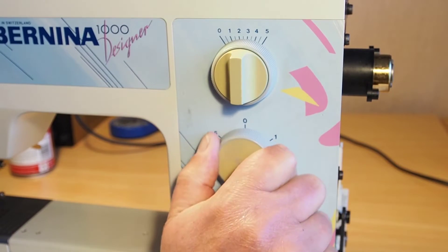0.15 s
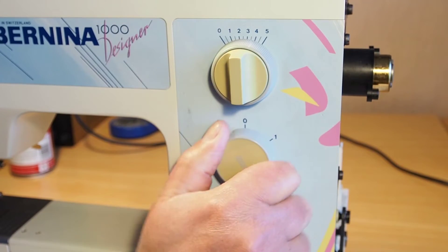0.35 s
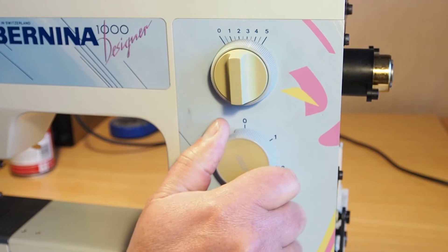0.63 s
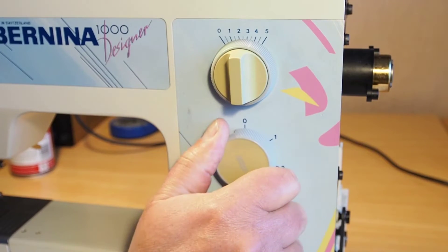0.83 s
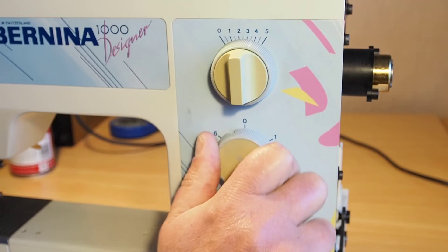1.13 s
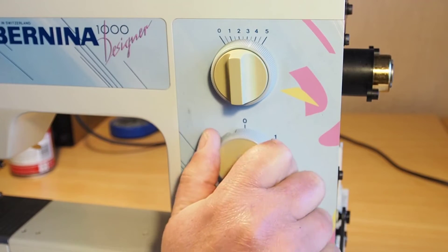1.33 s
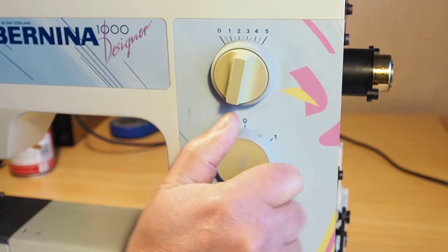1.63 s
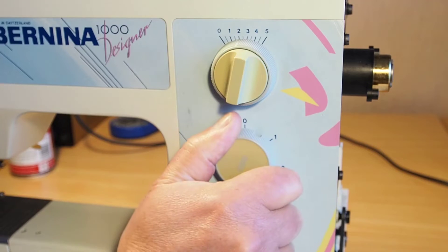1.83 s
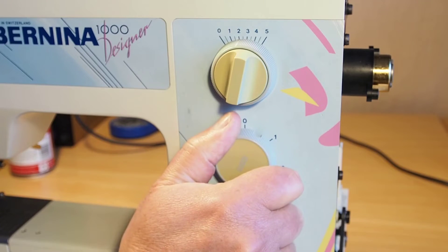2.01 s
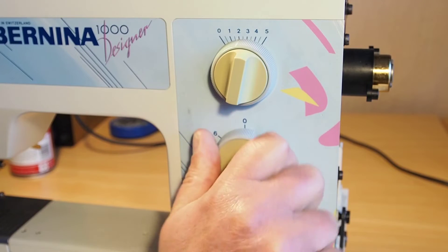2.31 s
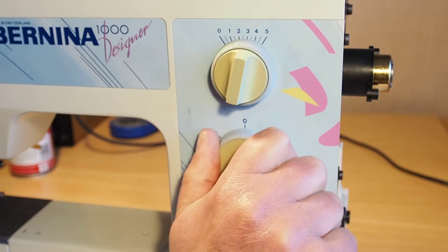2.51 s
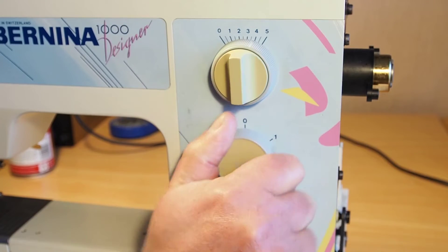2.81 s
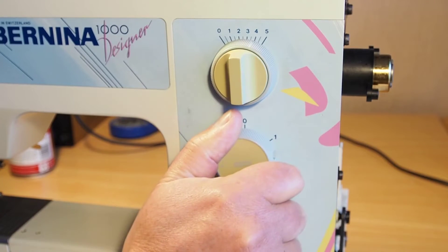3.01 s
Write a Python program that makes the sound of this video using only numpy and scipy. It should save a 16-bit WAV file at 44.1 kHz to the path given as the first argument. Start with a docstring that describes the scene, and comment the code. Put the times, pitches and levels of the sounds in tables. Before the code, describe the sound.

A sewing machine's selector dial clicks through three steps, close up in a small, quiet, hissing and faintly humming room. Soft scrapes and ticks begin around 0.1 s, then a bright snap at 0.37 s and a knock at 0.40 s set the metal frame ringing. Fingers brush softly from about 0.9 s. Ticks from 1.4 s lead to a sharp snap and knock at 1.65 s; another follows at 2.85 s, its ring fading.

```python
"""Hiss and low hum of a small quiet room, then fingers sliding on the selector dial of a sewing machine.
A hand turns the dial three steps, close to the microphone: soft scrapes and ticks as the linkage loads,
a bright rattle as the detent snaps over, then a knock as a part seats and leaves the metal frame ringing.
Gritty contacts drive decaying modes and a short ping; thuds and frame rings are plain sines.
Skin, air and room echoes are noise shaped by frequency."""
import sys
import numpy as np
from scipy import signal
from scipy.fft import rfft, irfft
from scipy.io import wavfile
from scipy.ndimage import uniform_filter1d

SR = 44100
rng = np.random.default_rng(int(sys.argv[2]) if len(sys.argv) > 2 else 0)


def unload_audio(sound):
    """Save the sound as a 16-bit wav file, at the path given as the first command line argument."""
    columns = np.transpose(np.atleast_2d(sound))
    # keep every value between -1 and 1, then stretch to whole-number steps
    steps = np.round(np.clip(columns, -1, 1) * 32767)
    wavfile.write(sys.argv[1], SR, steps.astype(np.int16))


N = 138915  # samples, 3.15 s

# a part seats after each snap: start_s, mid_modes_db, then relative to it low_modes_db, treble_modes_db,
# top_modes_db; contact_ms (decay), ping_hz, ping_db (relative)
SEATINGS = [(0.4037, -23.5, -1.1, -7.5, -21, 9.1, 4450, 7.7), (1.6708, -20.5, -2, -21, -7, 6.1, 4260, 0.75),
            (2.8785, -21, -2.4, -4, -13, 7.6, 4740, 8.1)]
# left-right likeness of the noise in the room: frequency_hz, likeness (0 to 1)
LIKENESS = [(30, 0.81), (125, 0.56), (300, .45), (2000, 0.15), (4000, .3), (5800, .4), (7500, 0.99),
            (16000, 1)]


def undb(db):
    """Decibels to amplitude."""
    return 10 ** (np.asarray(db) / 20)


def curve(table, hz):
    """Read a table of (frequency, value) at any frequency, on a logarithmic axis."""
    table = np.array(table, float)
    return np.interp(np.log(hz + 1), np.log(table[:, 0]), table[:, 1])


def stereo(gain, likeness, size=N):
    """Left and right noise with a gain and a likeness for each frequency."""
    hz = np.arange(size // 2 + 1) * SR / size
    alike = np.clip(curve(likeness, hz), 0, 1)
    spectra = rfft(rng.standard_normal((2, size))) * gain(hz)
    mid, side = spectra * np.sqrt([(1 + alike) / 2, (1 - alike) / 2])
    return irfft([mid + side, mid - side], size)


def level(x, db):
    """Scale to this RMS level over both channels."""
    return x * undb(db) / np.sqrt(np.mean(x ** 2))


def peak(x, db):
    """Scale each row so that its loudest two milliseconds have this level."""
    loudest = uniform_filter1d(x ** 2, SR // 500).max(-1, keepdims=True)
    return x * undb(db) / np.sqrt(loudest)


def add(out, s, x):
    """Mix x in at s seconds, cut off at the end."""
    i = int(s * SR)
    out[..., i:i + x.shape[-1]] += x[..., :out.shape[-1] - i]


def decay(t, t60):
    """A fade by 60 dB in t60 seconds."""
    return 1000 ** (-t / t60)


def air():
    """Steady hiss and rumble, wavering low tones made of narrow noise, and a faint high whine."""
    # colour of the air: frequency_hz, density_db (relative)
    air_colour = [(18, -27.5), (30, -6), (59, -13.5), (141, -16.5), (227, -11.5), (540, -19.5), (632, -20),
                  (780, -22.5), (913, -24.5), (1250, -21.5), (2230, -32), (2410, -26.5), (5740, -35),
                  (12600, -35.5), (16000, -40)]
    # wavering low tones: centre_hz, width_hz, level_db
    hums = [(50.4, 8, -68.5), (118.6, 10, -66), (252, 10.3, -68)]
    air_db, whine_hz, whine_db = -55.5, 12505, -78
    # the deepest rumble rolls off below 60 Hz
    hiss = stereo(lambda hz: undb(curve(air_colour, hz)) * np.clip(hz / 60, 0, 1) ** 2, LIKENESS)
    out = level(hiss, air_db)
    for centre, width, db in hums:
        out += level(stereo(lambda hz: np.exp(-((hz - centre) / width) ** 2), LIKENESS), db)
    whine = np.sqrt(2) * np.sin(2 * np.pi * whine_hz * np.arange(N) / SR)
    return out + undb(whine_db) * whine


def fingers():
    """Fingers slide on the knob: soft swells of skin noise."""
    # colour of skin on the knob: frequency_hz, density_db (relative)
    skin_colour = [(290, -42), (500, -5), (629, -9), (1240, -8), (1410, -15), (1650, -10), (2160, -17.5),
                   (4570, -14), (15500, -29.5)]
    # slides, of which one starts past the end and stays unheard: start_s, length_s, level_db (top of swell)
    slides = [(0.94, 0.39, -55), (2.026, 0.47, -60), (1.19, 0.66, -62), (5.2, 0.17, -52),
              (0.033, 0.57, -59.5)]
    skin = level(stereo(lambda hz: undb(curve(skin_colour, hz)) * (hz > 500), LIKENESS), 0)
    swells = np.zeros(N)
    for s, length_s, db in slides:
        add(swells, s, undb(db) * np.hanning(int(length_s * SR)))
    return skin * swells


def blow(rise_ms, cycles, db, low_db, treble_db, top_db, contact_ms, ping_hz, ping_db):
    """A gritty contact rings each group of modes, adds broad noise and sets off one short ping."""
    # modes of casing and linkage, low to high, in four tables: frequency_hz, strength_db (relative), t60_s
    low_modes = [(722, -14, 0.09), (876, 3, 0.014), (1270, -11, 0.049), (1486, -24.5, 0.05),
                 (1747, -6, 0.028), (1870, 3.5, 0.026)]
    mid_modes = [(2470, -7, 0.074), (2597, 2, .035), (3135, -9.5, .025), (3221, 3.5, 0.029),
                 (3584, 5, .015), (3900, -9, .015), (4056, -5, .02), (4590, -3, .025), (4750, -3, 0.0048),
                 (5300, -16.5, 0.022)]
    treble_modes = [(7750, -4, .005), (8550, 0, .009), (9660, 0, .012), (10500, -5, .004)]
    top_modes = [(11600, -8, .004), (12670, 8, 0.011), (13400, 7, .007), (14800, -7, .005)]
    # broad noise against the ringing of the same blow: low_db, mid_db, treble_db, top_db
    crack_levels = (-1, 2, 2, 5)
    # left-right difference: low_db (also the ping), mid_db, treble_db, top_db
    side_levels = (-13, -4, -9, -6)
    scatter_db, scatter_pitch = 2.5, .01  # spread of each mode from blow to blow
    ping_push = .12  # the push behind the ping lasts this share of the contact
    ping_to_room_db = -4.5  # the ping beams forward and reaches the walls less
    body_from_hz = 560

    t = np.arange(SR // 5) / SR
    roughness_db = 2.5 * np.repeat(rng.standard_normal(len(t) // 30), 30)
    grit = rng.standard_normal((2, len(t))) * undb(roughness_db)

    def push(length_ms):
        fade = np.exp(-t * 1000 / max(length_ms, .05))
        return grit * fade * np.minimum(t * 1000 / rise_ms, 1)

    def ears(x, side_db):
        return x[0] + undb(side_db) * x[1] * np.array([[1], [-1], [0]])  # left, right, room

    def strike(force, ring):
        return signal.fftconvolve(force, ring[None])[:, :len(t)]

    def ringing(hz, t60):
        return np.sin(2 * np.pi * hz * t) * decay(t, t60)

    ping = strike(push(contact_ms * ping_push), ringing(ping_hz, cycles / ping_hz))
    out = ears(peak(ping, db + ping_db), side_levels[0]) * undb([[0], [0], [ping_to_room_db]])
    groups = (low_modes, mid_modes, treble_modes, top_modes)
    group_levels = (low_db, 0, treble_db, top_db)
    for modes, rel_db, side_db, crack_db in zip(groups, group_levels, side_levels, crack_levels):
        hz, mode_db, t60 = np.array(modes).T[:, :, None]
        chance = rng.standard_normal((2,) + hz.shape)
        strengths = undb(mode_db + scatter_db * chance[0])
        ring = (strengths * ringing(hz * (1 + scatter_pitch * chance[1]), t60)).sum(0)
        band = signal.butter(3, [hz.min() * 0.8, hz.max() * 1.1], "band", fs=SR, output="sos")
        crack = signal.sosfilt(band, push(contact_ms))
        part = peak(strike(push(contact_ms), ring), 0) + peak(crack, crack_db)
        out = out + ears(peak(part, db + rel_db), side_db)
    return signal.sosfilt(signal.butter(4, body_from_hz, "high", fs=SR, output="sos"), out)


def dial():
    """Contacts in the dial: scrapes and ticks of the linkage, rattling snaps of the detent, seatings."""
    # soft scrapes, ticks of the loading linkage and rattles of the detent; columns as in SEATINGS
    scrapes = [(0.116, -55.5, 2, -15, -20, 11, 3000, -3), (.134, -53, 4.5, -15, -20, 34, 1790, -14),
               (0.2, -53.5, 4, -15, -16, 7.2, 1820, -2.5), (1.543, -46.5, 2, -11, -16, 12, 1690, -9),
               (1.58, -58, -5, -14, -20, 9, 1300, -8), (2.622, -56, -5, -5, -13, 30, 3100, -3),
               (2.768, -53, 1.5, -11, -18, 15, 4370, -4), (2.788, -53, -3, -10, -20, 30, 3250, -4)]
    ticks = [(0.1526, -37.5, -13, -4, -19, 4, 4320, 3.5), (1.416, -47, -11, -26, -22, 3.1, 3100, 1),
             (1.4232, -41.5, -7.5, 1, -5, 5.3, 3040, -6), (1.5365, -48, -5, -12, -15, 5.8, 4500, 4.5),
             (1.5625, -52.5, 10.5, -13, -20, 12.8, 1570, -13), (2.6512, -49, 0, -5.5, -16, 18, 3200, 3.5),
             (2.6625, -47.5, 5.5, -9, -14, 11, 1730, 10), (2.7299, -51, -10, -10, -15, 3, 3900, -6)]
    snaps = [(0.3708, -26, -22, -10.5, 6.5, 1.9, 3720, 4.5),
             (0.3737, -22.5, -4.5, 5.5, 2.5, 6.1, 3110, 2.5), (0.3799, -29.5, -8.5, 7.5, 1.5, 7, 9400, -7),
             (1.6369, -18, -21, 0.5, 0.5, 3, 3850, -15), (1.6424, -22.5, -7, 6, 6, 6.5, 2536, 4.5),
             (1.648, -37.5, -8.5, 6.5, -16.5, 21, 2520, 10), (2.8411, -26, -34, -1, -1, 12, 8100, 7.5),
             (2.8459, -27, -19, 6.5, 2, 3.3, 8900, 10), (2.8492, -28, -9, 5, 2, 4.7, 9800, 3.5),
             (2.8697, -33, -9, -10, -3, 1.8, 4540, 5)]
    # a row each for snaps, seatings, ticks, scrapes: rise_ms, ping_cycles (to fade by 60 dB)
    contacts = [(2.2, 40), (.5, 26), (1.0, 20), (6, 12)]
    out = np.zeros((3, N))  # left, right, room
    for events, contact in zip((snaps, SEATINGS, ticks, scrapes), contacts):
        for s, *how in events:
            add(out, s, blow(*contact, *how))
    return out


def thuds():
    """Low thuds, decaying sines: one near each snap and two between the turns."""
    # start_s, peak_db, pitch_hz, t60_s
    low_thuds = [(0.34, -41, 110, 0.31), (1.641, -36.5, 117, 0.1), (2.844, -38.5, 102, 0.16),
                 (0.65, -45, 52.5, 0.28), (2.2, -45, 130, 0.3)]
    out, t = np.zeros(N), np.arange(SR // 3) / SR
    for s, db, hz, t60 in low_thuds:
        rise = np.minimum(t * hz, 1)  # over one cycle
        add(out, s, undb(db) * np.sin(2 * np.pi * hz * t) * decay(t, t60) * rise)
    return out


def room(x):
    """Dense echoes: noise whose bands each die at their own rate."""
    # bands: centre_hz, t60_s, level_db
    bands = [(290, 0.14, -0.5), (1030, 0.29, -2), (3240, 0.28, -2), (7890, 0.22, -3.5), (14000, 0.22, -6.5)]
    # left-right likeness of the echoes: frequency_hz, likeness (0 to 1)
    echo_likeness = [(300, .8), (1000, 0.31), (3000, 0.15), (8000, 0.7), (15000, 0.31)]
    delay_s = 0.0046  # silent until then, full after twice as long
    size = SR // 2
    t, tail = np.arange(size) / SR, 0
    centres = [row[0] for row in bands]
    for (_, t60, db), share in zip(bands, np.eye(len(bands))):
        crossfade = list(zip(centres, share))  # 1 at this centre, 0 at the others
        band = stereo(lambda hz: np.sqrt(curve(crossfade, hz)), echo_likeness, size=size)
        even_energy = np.sqrt(2 * np.log(1000) / t60 / SR)  # whatever the decay time
        tail = tail + band * decay(t, t60) * undb(db) * even_energy
    tail = tail * np.clip(t / delay_s - 1, 0, 1)
    return signal.fftconvolve(x[None], tail, axes=1)[:, :N]


def frame():
    """The metal frame rings: thin tones that swell after each seating and fade slowly."""
    # pitch_hz, t60_s, rise_ms, first_seating_db, second_seating_db, third_seating_db
    rings = [(619, 0.48, 21, -29, -36, -33.5), (1243, 1.68, 15, -38, -46, -52),
             (1354, 1.4, 5, -54.5, -66, -68), (1414, 0.72, 15, -64, -48.5, -61),
             (2271, 1.9, 12.5, -67, -62, -64), (3760, .7, 8.9, -74.5, -55, -57),
             (1082, 0.26, 3.2, -37, -32, -34.5), (1555, .2, 4, -34, -36.5, -35.5),
             (1885, 0.12, 2.7, -26.5, -32, -39), (3160, 0.18, 3, -34, -33, -34),
             (4220, 0.067, 4, -32, -39, -48)]
    out, t = np.zeros(N), np.arange(2 * SR) / SR
    for hz, t60, rise_ms, *levels in rings:
        for (s, *_), db in zip(SEATINGS, levels):
            shape = (1 - np.exp(-t * 1000 / rise_ms)) * decay(t, t60)
            add(out, s, undb(db) * shape * np.sin(2 * np.pi * (hz * t + rng.random())))
    return out


def scene():
    """The dial close by, slightly stronger on the right, with its echoes, the fingers and the air."""
    left_db = -1.3  # left against right
    left, right, send = dial() + thuds()
    near = (np.array([left, right]) + frame()) * undb([[left_db / 2], [-left_db / 2]])
    return near + room(send) + fingers() + air()


def record(dry):
    """The camera microphone has a dip, cuts the top and sits a little off centre (a constant offset)."""
    dip_hz, dip_width_hz, dip_share = 6000, 1300, .55
    top_hz, offset = 15800, -.0036
    around_dip = signal.lfilter(*signal.iirpeak(dip_hz, dip_hz / dip_width_hz, fs=SR), dry)
    dipped = dry - dip_share * around_dip
    return signal.sosfilt(signal.ellip(10, .2, 80, top_hz, fs=SR, output="sos"), dipped) + offset


dry = scene()
out = record(dry)
unload_audio(out)
```